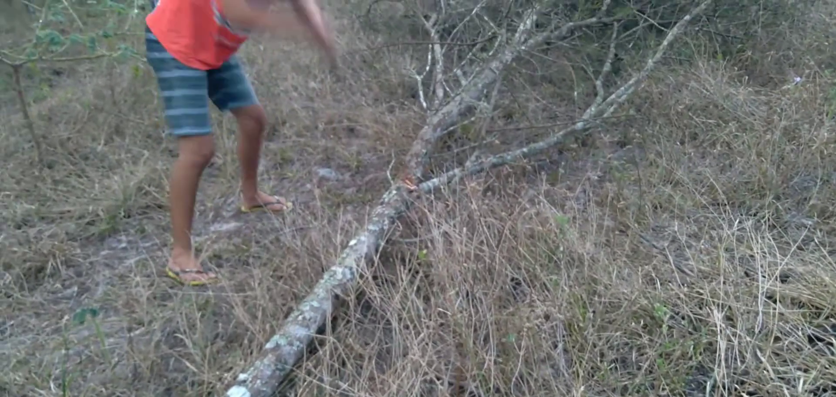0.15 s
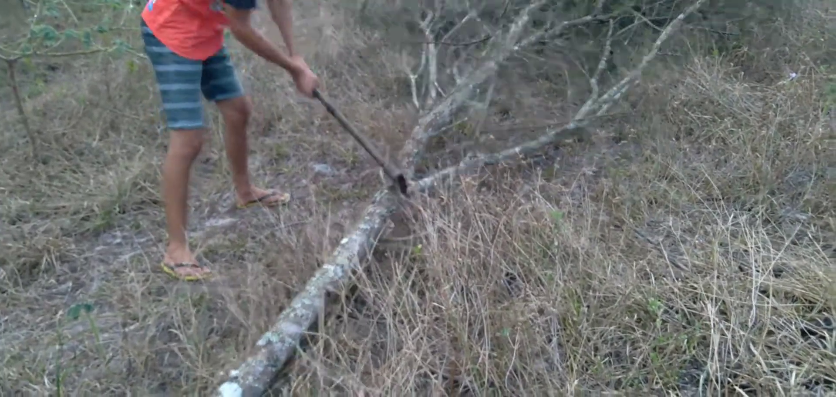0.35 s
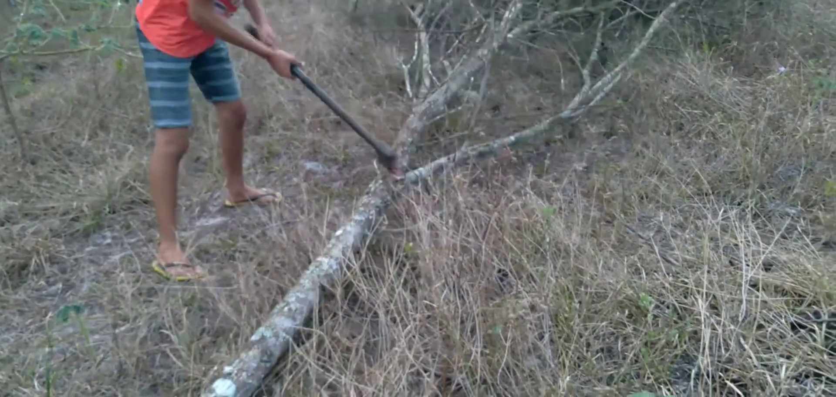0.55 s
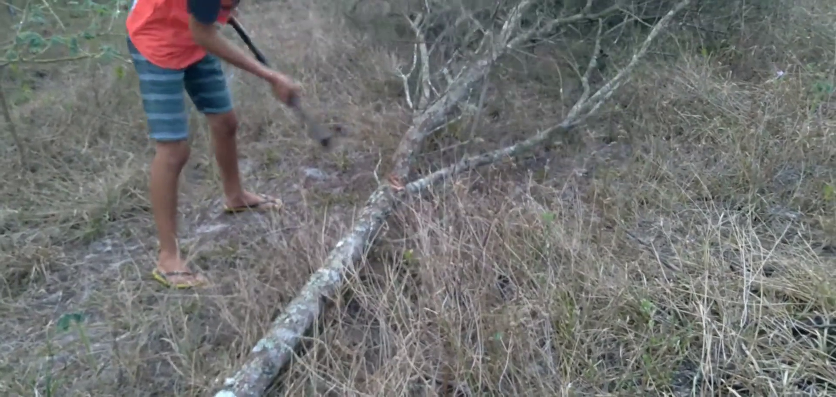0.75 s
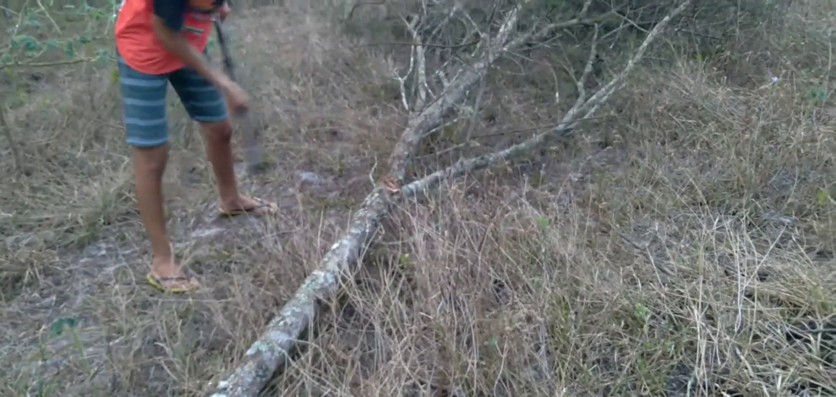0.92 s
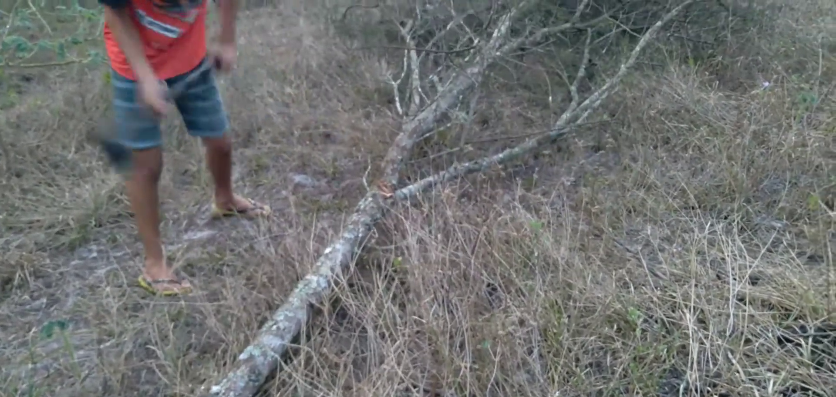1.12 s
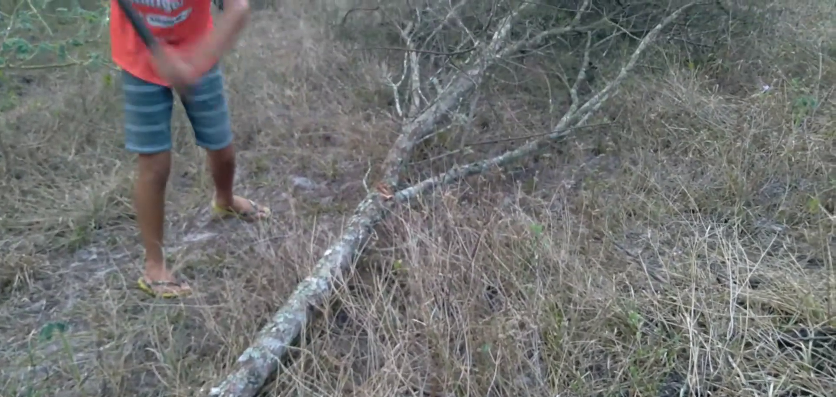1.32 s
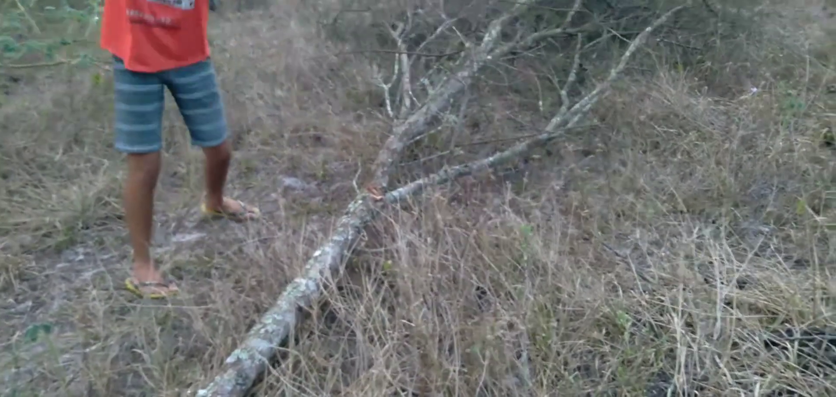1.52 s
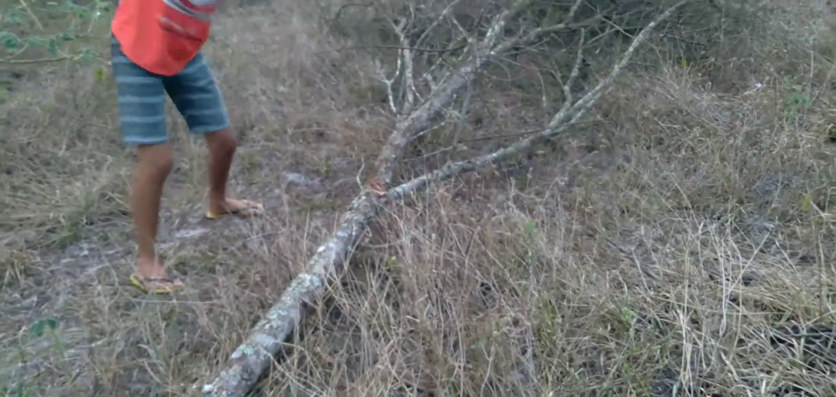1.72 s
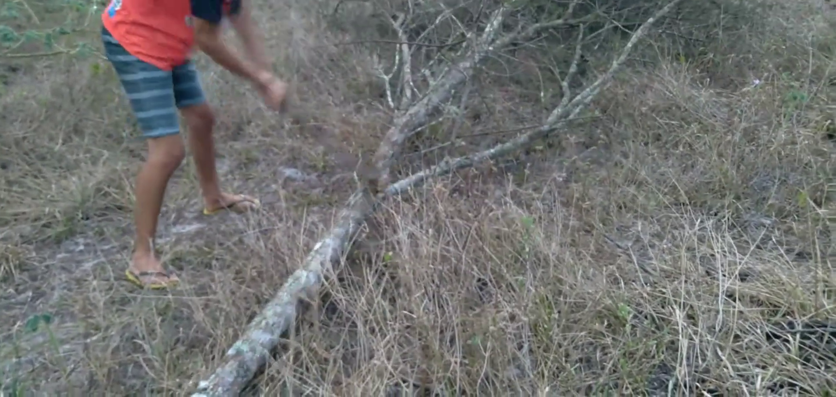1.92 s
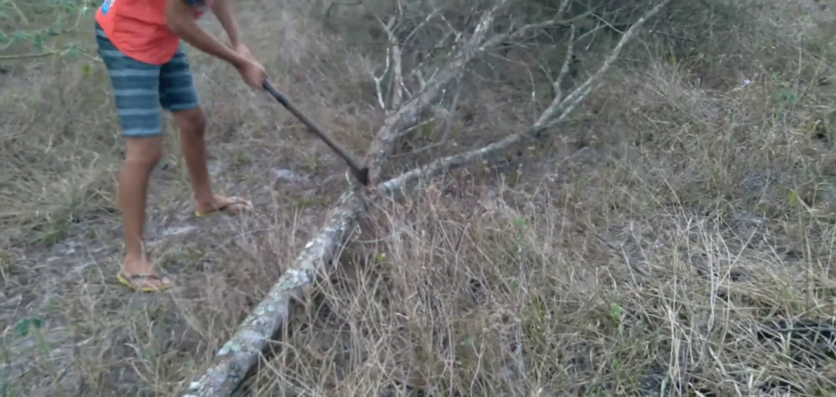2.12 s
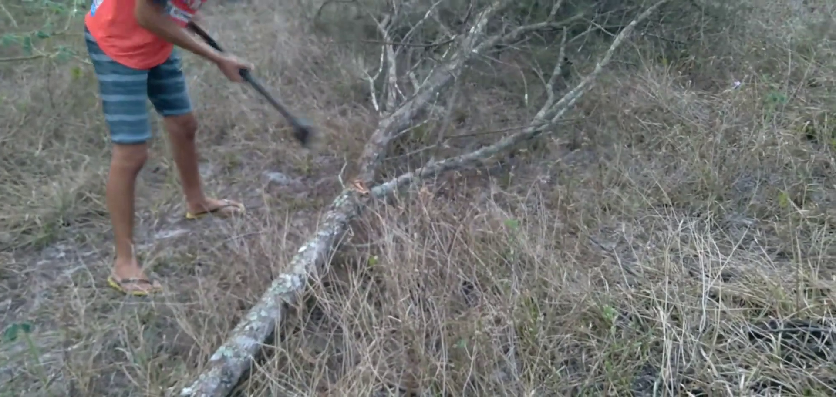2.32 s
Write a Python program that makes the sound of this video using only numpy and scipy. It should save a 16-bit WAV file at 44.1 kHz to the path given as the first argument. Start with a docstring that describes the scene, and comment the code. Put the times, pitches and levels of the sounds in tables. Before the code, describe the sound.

An axe hits a dry fallen trunk at about 0.2 seconds with a sharp, close crack and low thud, leaving dead twigs rustling and snapping until 0.7. Light handle knocks follow near 0.7, 1.1 and 1.5 seconds, with a dry grass scuff around 1.4. Wind softly puffs on the microphone near 0.8 and 1.65. A second, deeper blow lands at 1.9 seconds, and twigs crackle again.

```python
"""Axe on a dry fallen trunk

Open scrub, a nearly mono microphone, near enough to overload on the two blows. Each one splinters
the wood, thuds the trunk into the ground and sets dead twigs rustling and snapping. Between them come
three light knocks of the handle and a scuff through dry grass. Wind puffs on the microphone;
faint background noise flickers in narrow bands, and an insect sings for a moment."""
import sys
import numpy as np
from scipy import signal
from scipy.io import wavfile
from scipy.ndimage import uniform_filter1d

SR = 44100
rng = np.random.default_rng(int(sys.argv[2]) if len(sys.argv) > 2 else 0)


def digitize_waveform(pressure):
    """Quantize a signal to 16-bit integers and store it at the path in sys.argv[1].

    Rows of a 2-D input are taken as channels; values are limited to [-1, 1].
    """
    field = np.atleast_2d(pressure).T
    bounded = np.clip(field, -1, 1)
    quanta = np.round(bounded * 32767).astype(np.int16)
    wavfile.write(sys.argv[1], SR, quanta)


N = 103635

# axe blows: start_s, level_db, low_mode_tilt_db_per_octave
AXE_BLOWS = [(0.2212, -0.5, 7.5), (1.8852, -1, -4.5)]


def amp(db):
    """Decibels to gain."""
    return 10 ** (np.asarray(db) / 20)


def rms_one(x):
    """Scale to rms 1."""
    return x / np.sqrt(np.mean(x ** 2) + 1e-20)


def butter(x, order, hz, kind):
    """Butterworth filter."""
    return signal.sosfilt(signal.butter(order, hz, kind, fs=SR, output="sos"), x)


def in_time(rows, start_s=0):
    """The columns after time_s, interpolated at every sample."""
    times, *columns = np.transpose(rows)
    return [np.interp(np.arange(N) / SR - start_s, times, column) for column in columns]


def drift(rate_hz):
    """A smooth random wander of rms 1."""
    r = np.exp(-2 * np.pi * rate_hz / SR)
    return rms_one(signal.lfilter([1], [1, -2 * r, r * r], rng.standard_normal(N + SR))[SR:])


def ring(force, hz, t60_s):
    """One mode: a unit click starts a dying sine of height 1."""
    r, w = amp(-60 / (t60_s * SR)), 2 * np.pi * hz / SR
    return signal.lfilter([0, np.sin(w)], [1, -2 * r * np.cos(w), r * r], force + 1e-18)


def clicks(size, per_s, spread_db):
    """Random clicks of uneven size and sign."""
    heights = amp(spread_db * np.minimum(rng.exponential(1, size), 4)) * rng.choice([-1, 1], size)
    return heights * (rng.random(size) < per_s / SR)


def rustle(spectrum, per_s, spread_db, hiss, patchy_db, bands_per_octave, patch_hz=25, age_s=0):
    """Crackle and hiss in flickering bands whose balance shifts with age; rms 1 at age 0."""
    # extra decay of each band, negative where it lingers: pitch_hz, decay_db_per_s
    band_decay = [(200, 49), (450, 27.5), (700, 5.5), (1100, -11), (1600, 5.5), (2300, 5.5), (3200, 22.5),
                  (4200, 16), (5200, 0), (7000, -2.5), (11000, -7.5), (15000, 12.5)]
    decay_hz, decay_db_per_s = np.transpose(band_decay)
    hz, db = np.transpose(spectrum)
    edges = np.geomspace(hz[0], hz[-1], int(bands_per_octave * np.log2(hz[-1] / hz[0])) + 2)
    out, fresh_power, flicker_db = 0, 0, drift(40)
    crackles = [rms_one(clicks(N, per_s, spread_db)) + hiss * rng.standard_normal(N) for _ in range(4)]
    patches = [drift(patch_hz) for _ in range(7)]
    for k, (low, high) in enumerate(zip(edges, edges[1:])):
        log_centre = np.log(low * high) / 2
        patch_db = patchy_db * np.roll(patches[k % 7], k * 3001)
        band = butter(crackles[k % 4], 2, [low, high], "band")
        band *= amp(np.interp(log_centre, np.log(hz), db) + flicker_db + patch_db)
        fresh_power += np.mean(band ** 2)
        out += band * amp(-age_s * np.interp(log_centre, np.log(decay_hz), decay_db_per_s))
    return out / np.sqrt(fresh_power)


def mic_hiss():
    """The microphone's own steady hiss, soft at the top."""
    return amp(-78) * signal.lfilter([.5, .5], [1], rng.standard_normal(N))


def background_noise():
    """Faint background noise flickering in narrow, slowly shifting bands."""
    # loudness of the noise: time_s, level_db
    levels = [(0, -60), (.06, -64), (.11, -72), (.14, -64), (.2, -62), (.9, -63), (1.0, -66), (1.09, -69),
              (1.125, -59), (1.2, -71), (1.3, -70), (1.54, -71), (1.62, -82), (1.86, -92)]
    # its spectrum: pitch_hz, relative_db
    spectrum = [(150, -54.5), (250, -31), (287, -8), (922, -6.5), (1020, 6.5), (1280, -24), (1880, -14.5),
                (4340, -20), (5070, -16.5), (8550, -6), (16000, -14)]
    noise = rustle(spectrum, per_s=690, spread_db=2.5, hiss=1.5, patchy_db=6,
                   bands_per_octave=14, patch_hz=6)
    return amp(in_time(levels)[0]) * noise


def insect(start_s=1.63, end_s=1.87, pitch_hz=6700, throb_hz=60):
    """A thin, throbbing band of noise swells once and fades."""
    t = np.arange(N) / SR
    song = rms_one(ring(rng.standard_normal(N), pitch_hz, t60_s=.05))
    throb = 1 + .7 * np.sin(2 * np.pi * throb_hz * t)
    progress = np.clip((t - start_s) / (end_s - start_s), 0, 1)
    swell = np.sin(np.pi * progress ** .5) ** 2
    return amp(-72) * swell * song * throb


def wind(pitch_hz=65, width_hz=40, under_blows_db=-64.5):
    """Wind on the microphone: lumpy rumble round one low pitch, and a one-cycle puff with a faint tick."""
    # four stretches of gusts, each: time_s, level_db
    gusts = [
        [(0.02, -32.5), (0.042, -82.5), (0.08, -94), (0.088, -79), (0.118, -75), (0.142, -94), (0.16, -88),
         (0.19, -62)],
        [(0.45, -112.5), (0.66, -66), (0.694, -51.5), (0.752, -61), (0.776, -46.5), (0.838, -33), (0.864, -38),
         (0.92, -65.5), (0.934, -52), (1.126, -64), (1.2, -89), (1.248, -69), (1.306, -91), (1.342, -55),
         (1.412, -72), (1.488, -62), (1.52, -86), (1.635, -45)],
        [(1.685, -54), (1.691, -53), (1.713, -55), (1.745, -59.5), (1.855, -75), (1.86, -70.5)],
        [(2.1, -51), (2.112, -92), (2.142, -64), (2.212, -68), (2.234, -65), (2.296, -56), (2.35, -92.5)],
    ]
    # the single puff: centre_s, level_db, pitch_hz
    puffs = [(1.6545, -30, 78)]
    first, second, third, fourth = map(list, gusts)
    levels = first + [(.25, under_blows_db)] + second + third + [(1.95, under_blows_db)] + fourth
    noise = rng.standard_normal((2, N + SR))
    broad = butter(noise, 6, 190, "low")
    narrow = rms_one(ring(broad[0], pitch_hz, 2.2 / width_hz))
    rumble = (narrow + amp(-14.5) * rms_one(broad[1]))[SR:]
    # even out the rumble so that the gusts set its level
    rumble /= np.sqrt(uniform_filter1d(rumble ** 2, size=1800) + .05 * np.mean(rumble ** 2))
    out, t = amp(in_time(levels)[0]) * rumble, np.arange(N) / SR
    tick = amp(-30) * signal.lfilter([.3], [1, -.7], noise[0, :N])
    for centre_s, db, hz in puffs:
        cycles = (t - centre_s) * hz
        out += amp(db) * (np.sin(2 * np.pi * cycles) + tick) * np.exp(-(1.9 * cycles) ** 2)
    return out


def grass_scuff():
    """One sweep through dry grass makes a dense crackle."""
    # loudness of the sweep: time_s, level_db
    levels = [(1.28, -76.5), (1.325, -59.5), (1.337, -43), (1.341, -38), (1.355, -33.5), (1.377, -29.5),
              (1.4, -37), (1.417, -32.5), (1.44, -41), (1.5, -49), (1.512, -60.5), (1.56, -85)]
    # spectrum of the grass: pitch_hz, relative_db
    spectrum = [(410, -81), (700, -61), (898, -12), (1050, -25), (1090, -51), (1260, -66), (1680, -1.5),
                (2050, -17.5), (2190, -11.5), (2430, -2.5), (4380, -4), (5760, 6), (8210, 4.5), (13100, -7),
                (16000, -6)]
    t = np.arange(N) / SR
    sweeping = (t > levels[0][0]) & (t < levels[-1][0])
    grass = rustle(spectrum, per_s=2200, spread_db=3, hiss=1, patchy_db=3.5, bands_per_octave=8)
    return sweeping * amp(in_time(levels)[0]) * grass


def handle_knocks():
    """Short, soft rubs ring the axe handle; the high modes get a shorter push."""
    # modes of the handle: pitch_hz, level_db, t60_s
    modes = [(800, -7, .02), (1141, 0, .024), (1615, -4, .02), (2250, -8, .018), (2961, -15, .018),
             (3558, -12, .02), (5136, -10, .008), (6255, -7, .008), (7000, -7, .008), (7596, -5, .008),
             (8656, -9, .008)]
    # knocks: start_s, level_db, low_mode_tilt_db_per_octave, high_mode_db, low_mode_push_s
    knocks = [(0.707, -37, 1, -12, 0.017), (1.104, -38.5, -1, 7.5, 0.023), (1.486, -45, -2.5, -10, 0.0212)]
    out = np.zeros(N)
    for hz, mode_db, t60_s in modes:
        force, is_high = np.zeros(N), hz > 3000
        resonance = [1, -1.94 * np.cos(2 * np.pi * hz / SR), .94]
        for start_s, db, tilt_db, high_db, push_s in knocks:
            i, size = int(start_s * SR), int(push_s * SR * (.6 if is_high else 1))
            rub = signal.lfilter([1], resonance, rng.standard_normal(size)) * np.hanning(size)
            rub /= np.abs(ring(rub, hz, t60_s)).max()
            colour_db = high_db if is_high else tilt_db * np.log2(hz / 1141)
            force[i:i + size] = rub * amp(db + mode_db + colour_db)
        out += ring(force, hz, t60_s)
    return out


def crown_rustle():
    """A blow sets dead twigs and branches rustling; it fades, then cuts off as a noise gate closes."""
    # rustle levels, with the gate's drop written in at 0.66-0.69 s: after_blow_s, twigs_db, branches_db
    levels = [(0, -25.5, -38), (.007, -12, -19), (.015, -16, -20), (.03, -17.5, -21), (.045, -26, -32),
              (.09, -30.5, -36.5), (.17, -34.5, -40.5), (.3, -36, -41.5), (.43, -39.5, -45.5),
              (.56, -44.5, -48.5), (.66, -50.5, -61), (.69, -65, -69.5), (.8, -69, -80),
              (1.0, -76.5, -76.5), (1.2, -100, -100)]
    # bright spectrum of the twigs: pitch_hz, relative_db
    twig_spectrum = [(1760, -38.5), (3000, -12.5), (4200, -7.5), (5000, -3.5), (7200, -1.5), (10000, -8.5),
                     (15000, -7), (16000, -11)]
    # midrange spectrum of the branches: pitch_hz, relative_db
    branch_spectrum = [(120, -34.5), (200, -3), (435, 2), (481, -13.5), (970, 4), (1450, -1), (1580, 4),
                       (3110, -0.5), (4000, -5.5), (5200, -34.5), (8800, -120)]
    twig_gain, branch_gain, age_s = np.zeros((3, N))
    for start_s, db, _ in AXE_BLOWS:
        after = np.arange(N) >= start_s * SR
        age_s[after] = np.minimum(np.arange(after.sum()) / SR, .9)
        twig_db, branch_db = in_time(levels, start_s)
        twig_gain += after * amp(twig_db + db)
        branch_gain += after * amp(branch_db + db)
    twigs = rustle(twig_spectrum, per_s=760, spread_db=3, hiss=2.2, patchy_db=.5,
                   bands_per_octave=4, age_s=age_s)
    branches = rustle(branch_spectrum, per_s=300, spread_db=0, hiss=.9, patchy_db=1.5,
                      bands_per_octave=5, age_s=age_s)
    return twig_gain * twigs + branch_gain * branches


def twig_snaps(burst_s=.007, ring_cycles=9):
    """Single twigs snap: a bright burst of noise rings briefly at one pitch."""
    # snaps: start_s, relative_db, pitch_hz
    snaps = [(0.2443, -13.5, 9700), (0.273, -21, 7800), (.512, -33, 7600), (.541, -23.5, 7080),
             (.592, -35, 5800), (0.609, -34, 7160), (0.648, -36, 7400), (.675, -39.5, 2220),
             (0.784, -51, 3360), (0.921, -55, 4150), (1.996, -23.5, 7680), (2.09, -30, 6900),
             (2.173, -35, 6660), (2.216, -30, 7150), (2.27, -32.5, 7260), (2.337, -38, 2170)]
    out, size = np.zeros(N), int(burst_s * SR)
    for start_s, db, hz in snaps:
        force, i, t60_s = np.zeros(N), int(start_s * SR), ring_cycles / hz
        force[i:i + size] = np.hanning(size) * np.diff(rng.standard_normal(size + 2), 2)
        snap = ring(ring(force, hz, t60_s), hz, t60_s)
        out += amp(db + 6.5) * snap / np.abs(snap).max()
    return out


def ground_thud(delay_s=.03, soften_hz=200, shudder_db=-35, shudder_t60_s=.46):
    """The trunk pushes softly into the ground a moment after each blow, then goes on shuddering."""
    # low modes of the trunk on the ground: pitch_hz, relative_db, t60_s
    modes = [(68, -38.5, .09), (122, -18.5, 0.051), (178.2, -17, 0.049), (267.7, -23, 0.14),
             (416, -20.5, 0.071)]
    push, t = np.zeros(N), np.arange(N) / SR
    for start_s, db, _ in AXE_BLOWS:
        push[int(start_s * SR)] = amp(db - 11.5)
        push[int((start_s + delay_s) * SR)] = amp(db)
        shudder = amp(db + shudder_db - 60 * np.abs(t - start_s) / shudder_t60_s)
        push += (t > start_s + delay_s) * shudder * rng.standard_normal(N)
    r = np.exp(-2 * np.pi * soften_hz / SR)
    soft_push = signal.lfilter([(1 - r) ** 2], [1, -2 * r, r * r], push + 1e-18)
    return sum(amp(db) * ring(soft_push, hz, t60_s) for hz, db, t60_s in modes)


def axe_bites(graze_s=.005, graze_db=-33, split_s=.012):
    """The blade grazes, the wood cracks and a short run of splitting fibres rings the trunk."""
    # modes of the dry trunk: pitch_hz, relative_db, t60_s
    modes = [(800, -23, 0.0081), (977, -5.5, 0.051), (1173, -3.5, 0.031), (1289, -5.5, 0.039),
             (1580, -6.5, 0.038), (2052, -10.5, 0.013), (2307, -9, .018), (3010, -17.5, 0.004),
             (3770, -14.5, .012), (5095, -21, .01), (5760, -23, .012), (6746, -4.5, 0.013),
             (7600, -10.5, 0.0043), (8600, -19, 0.017)]
    out, size, lead = np.zeros(N), int(split_s * SR), int(graze_s * SR)
    for hz, mode_db, t60_s in modes:
        force = np.zeros(N)
        for start_s, db, tilt_db in AXE_BLOWS:
            i = int(start_s * SR)
            cracks = clicks(size, per_s=1800, spread_db=5.5)
            cracks[0] = 3.6 if hz < 1700 else .1  # the first crack drives mainly the low modes
            cracks /= np.sqrt(np.sum(cracks ** 2))
            colour_db = (hz < 3000) * tilt_db * np.log2(hz / 1200)
            force[i:i + size] = cracks * amp(db + mode_db + colour_db)
            graze = amp(graze_db + np.linspace(-20, 0, lead)) * rng.standard_normal(lead)
            force[i - lead:i] = graze * amp(db + mode_db)
        out += ring(force, hz, t60_s)
    return butter(out, 2, 370, "high")


def scene():
    """Everything sits in the centre; only the top treble differs a little between the channels."""
    mid = axe_bites() + handle_knocks() + ground_thud() + crown_rustle() + twig_snaps() + grass_scuff()
    mid += wind() + insect() + background_noise() + mic_hiss()
    side = amp(-14) * butter(mid * drift(300), 4, 11000, "high")
    return mid + side * np.array([[1], [-1]])


def record(dry, bass_cut_hz=66, ceiling=.8, stopband_hz=16400):
    """The microphone chain cuts the deep bass, overloads softly on peaks and cuts the top treble."""
    drive = butter(dry, 3, bass_cut_hz, "high") / ceiling
    overloaded = ceiling * drive / (1 + drive ** 4) ** .25
    return signal.sosfilt(signal.cheby2(14, 60, stopband_hz, fs=SR, output="sos"), overloaded)


dry = scene()
out = record(dry)
digitize_waveform(out)
```